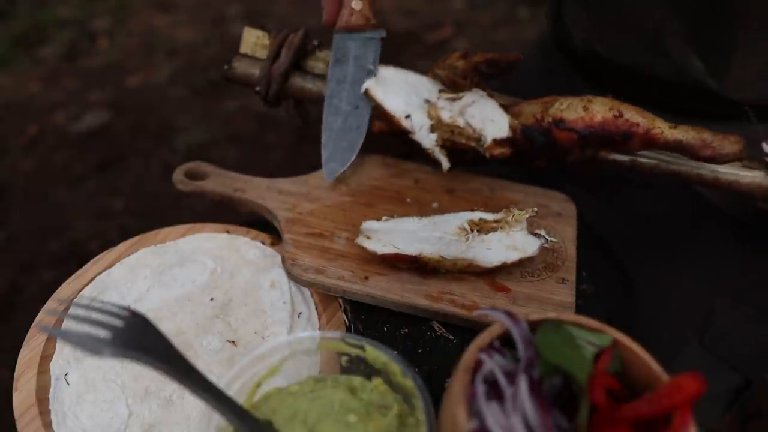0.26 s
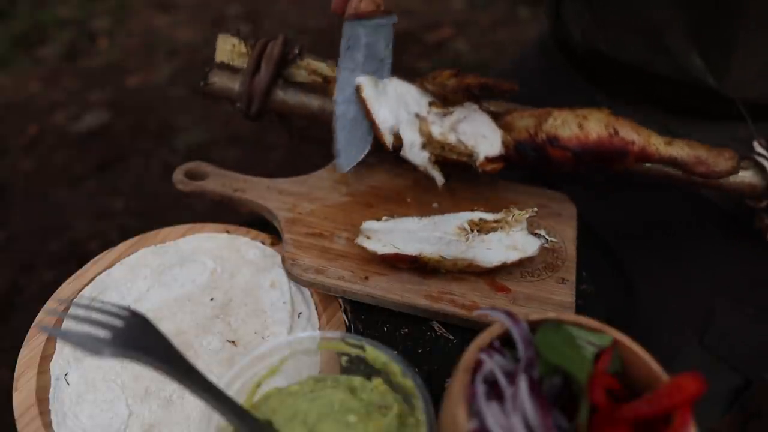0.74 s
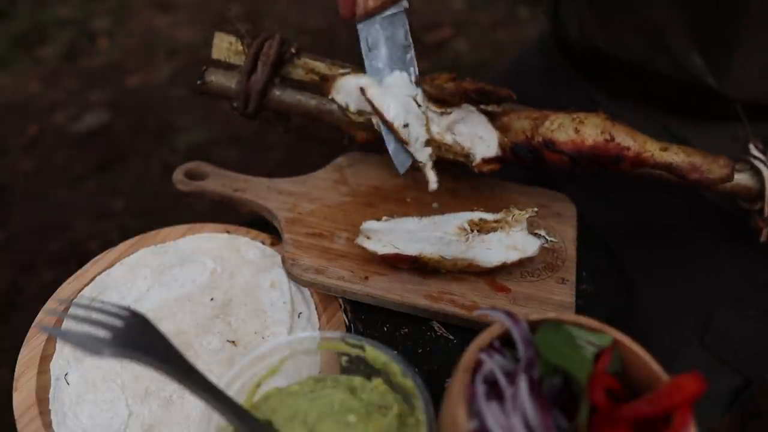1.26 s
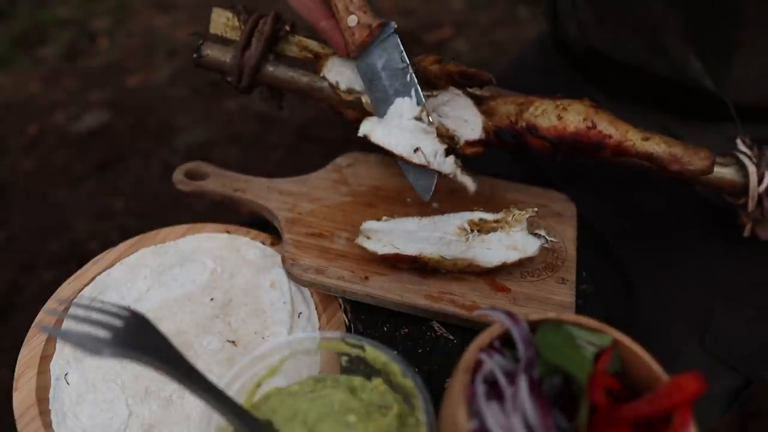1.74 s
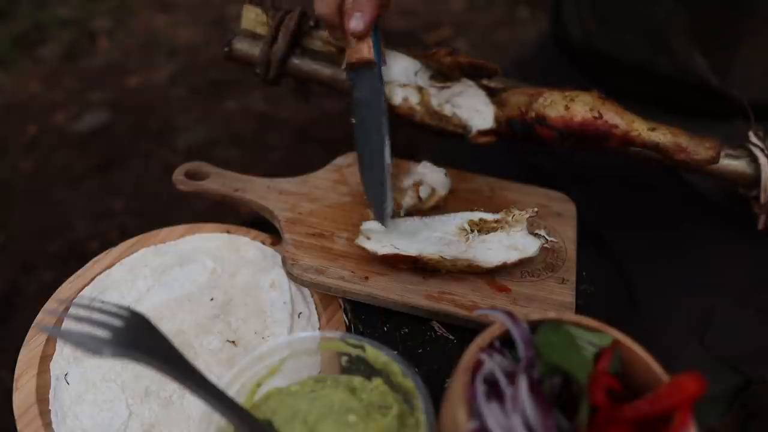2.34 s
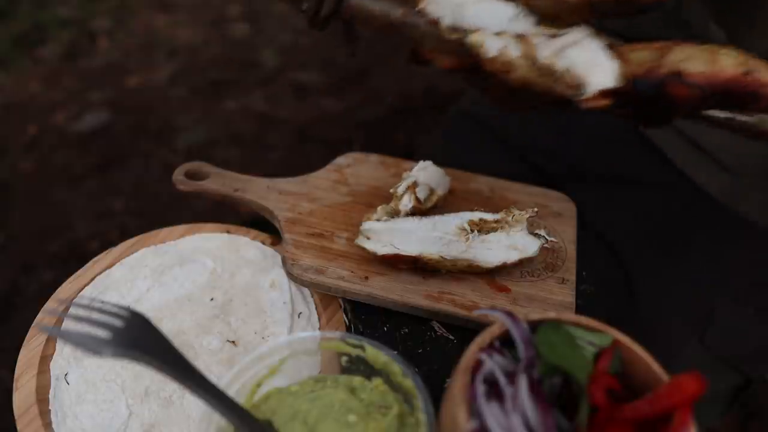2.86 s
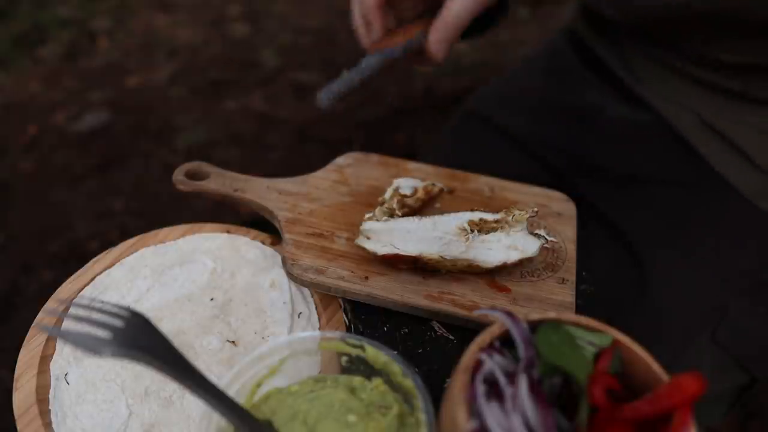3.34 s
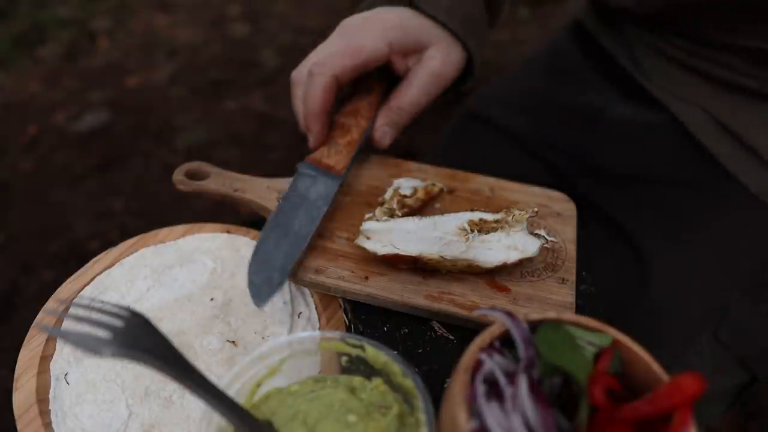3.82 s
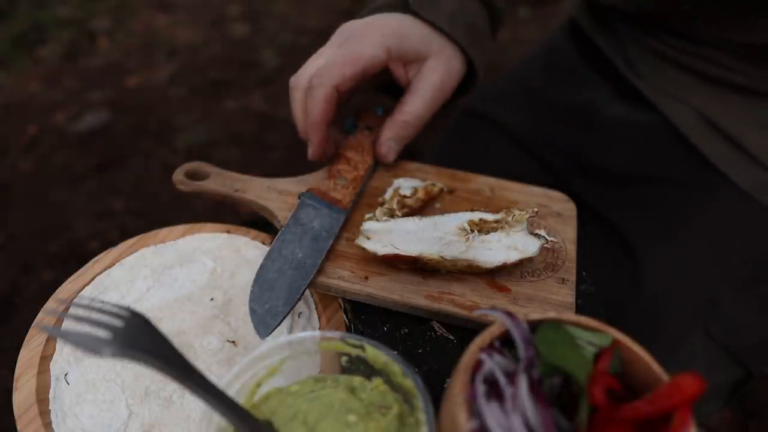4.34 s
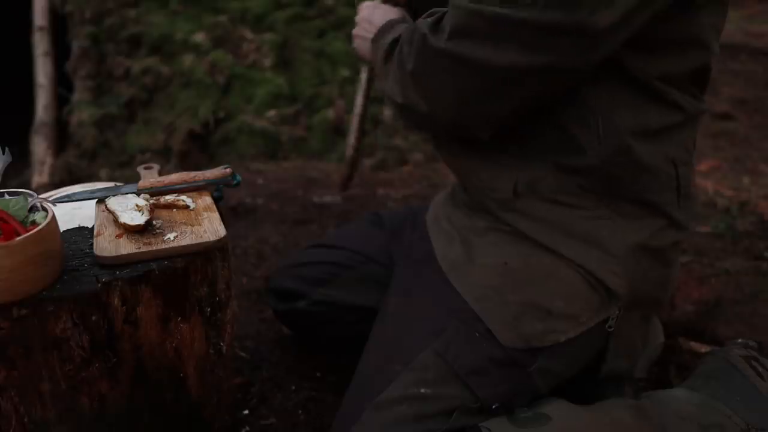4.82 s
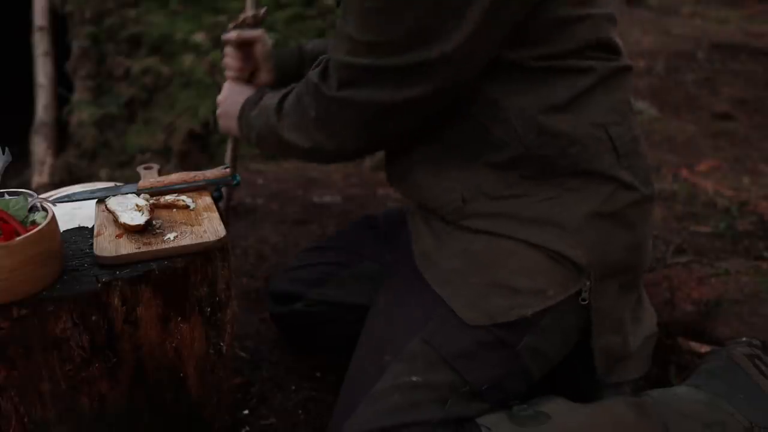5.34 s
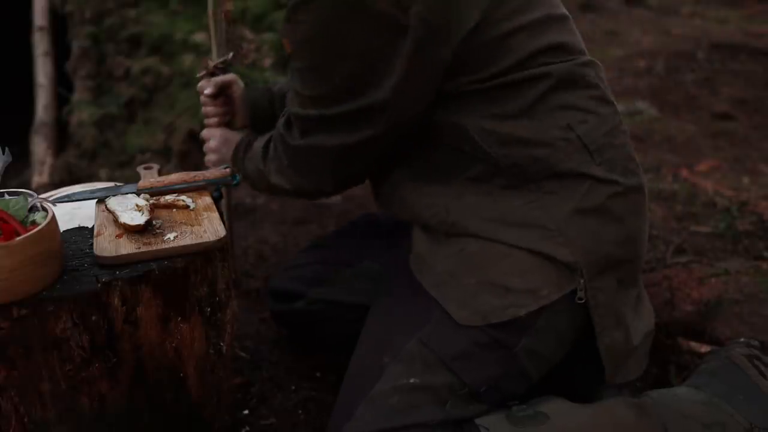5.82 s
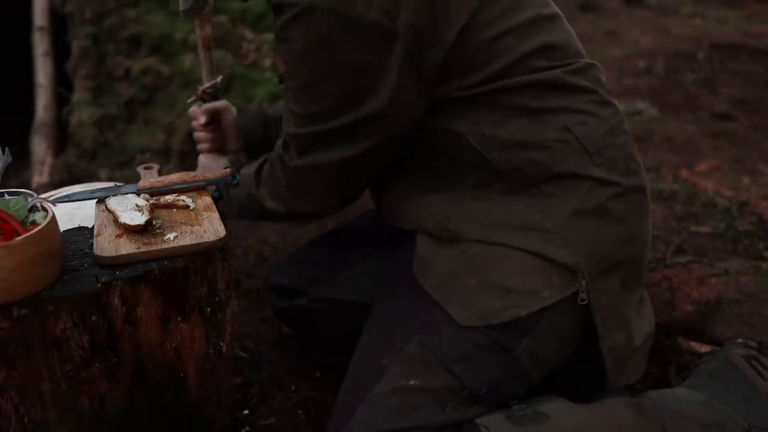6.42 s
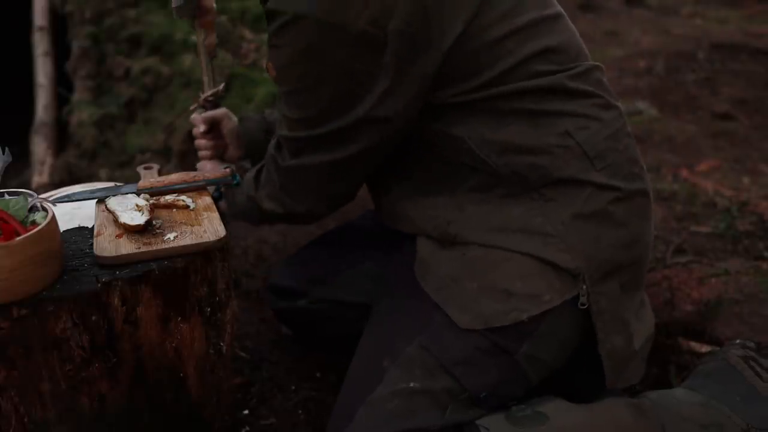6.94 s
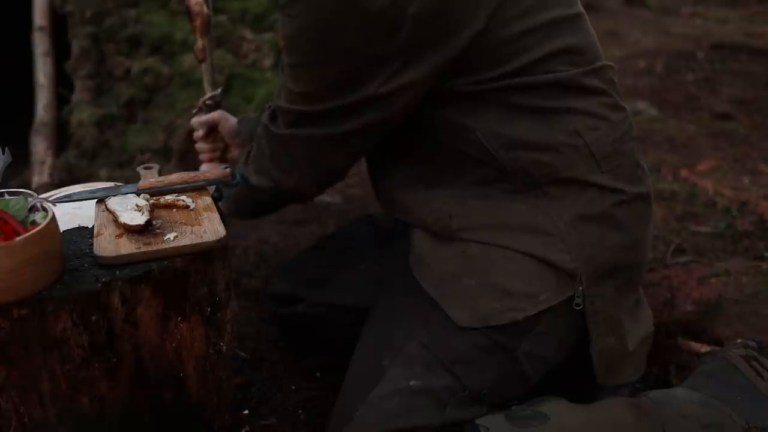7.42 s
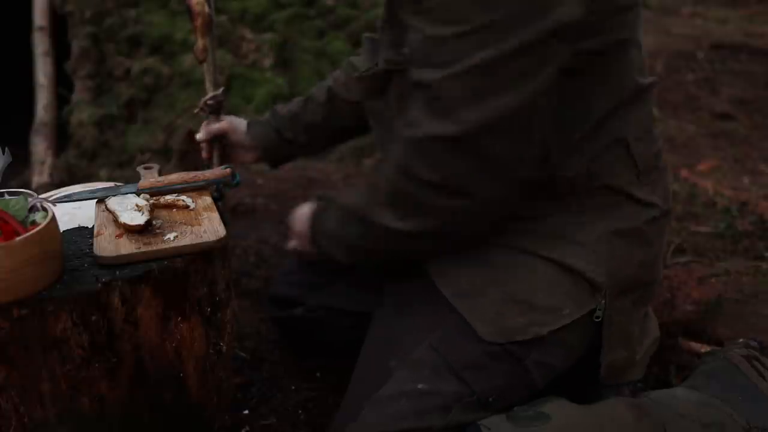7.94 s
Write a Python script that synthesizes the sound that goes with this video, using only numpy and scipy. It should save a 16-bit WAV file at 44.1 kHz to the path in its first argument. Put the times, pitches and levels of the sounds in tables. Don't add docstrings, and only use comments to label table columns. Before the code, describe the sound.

Very close to one microphone outdoors, fat spits and meat fibres tear with dry crackles as a knife saws, over a low throbbing hum of two distant motors. Embers pop and a sleeve rustles. The knife lands on a wooden board with a hard, distorted knock and rocking clacks. The hum then cuts off, leaving louder cloth rustle and twigs snapping under a stick.

```python
import sys
import numpy as np
from scipy import signal
from scipy.fft import rfft, irfft, next_fast_len
from scipy.io import wavfile
from scipy.ndimage import uniform_filter1d

SR = 44100
rng = np.random.default_rng(int(sys.argv[2]) if len(sys.argv) > 2 else 0)


def amplitude_ratio(level_db):
    exponent = np.asarray(level_db, float) / 20
    return 10 ** exponent


def log_audio(samples):
    frames = np.atleast_2d(samples).T
    limited = np.clip(frames, -1, 1)
    pcm = np.round(limited * 32767).astype(np.int16)
    wavfile.write(sys.argv[1], SR, pcm)


N = 360736
FLOOR_EDGE_HZ = 15800

# t/s, level/dB, tilt/dB per octave, steel tick/dB, damping factor
FLAT_HITS = [
    (4.0430, 6, 0, -10, 1.01),
    (4.0475, -6, -1.5, -13, 1.5),
    (4.0590, -18, -2.5, -18, 1.01),
    (4.0664, -22, -2.5, -20, 1.01),
    (4.0798, -14, -2.5, -14, .75),
    (4.0880, -24, -4, -20, .8),
    (4.0940, -21, -6, -25, .7),
]


def evened(x):
    return x / np.sqrt(np.mean(x ** 2) + 1e-20)


def read(points, hz):
    f, value = np.transpose(points)
    return np.interp(np.log(hz + 1), np.log(f + 1), value)


def add(mix, s, sound):
    part = mix[max(round(s * SR), 0):][:len(sound)]
    part += sound[:len(part)]


def band(x, hz, width_hz):
    centre_hz = np.clip(hz, 20, .45 * SR)
    return signal.lfilter(*signal.iirpeak(centre_hz, centre_hz / width_hz, SR), x)


def dulled(x, hz, order=4):
    return signal.sosfilt(signal.butter(order, min(hz, .45 * SR), fs=SR, output="sos"), x)


def noise(spectrum, patchy_db, flicker_db):
    frames, hz = N // 128 + 5, np.fft.rfftfreq(512, 1 / SR)
    real, imaginary, patches = rng.standard_normal((frames, 257, 3)).T
    patches = evened(uniform_filter1d(uniform_filter1d(patches, 10, 0), 20, 1))
    flicker = flicker_db * rng.standard_normal(frames)
    field_db = read(spectrum, hz)[:, None] + patchy_db * patches + flicker
    field = (real + 1j * imaginary) * amplitude_ratio(field_db)
    return evened(signal.istft(field, nperseg=512, noverlap=384)[1][:N])


def air(extra=((1, 0), (2, 0)), db=0):
    # f/Hz, density/dB per Hz
    air_colour = [(12, -37), (22, -16.5), (91, 5), (500, -8), (1310, -18.5), (2870, -28.5), (6130, -23.5),
                  (15000, -36.5)]
    count = next_fast_len(N)
    hz = np.fft.rfftfreq(count, 1 / SR)
    size = amplitude_ratio(read(air_colour, hz))
    coloured = irfft(rfft(rng.standard_normal(count)) * size * amplitude_ratio(read(extra, hz)), count)[:N]
    return amplitude_ratio(-53 + db) * coloured / np.sqrt(np.mean(size ** 2))


def motors():
    shaft_hz = (88.79, 99.80)
    crest_s = (.0012, .0068)
    # multiple of shaft f, level/dB
    shaft_orders = [
        [(1, 0), (2, -15)],
        [(1, -7.5), (2, -21), (3, -17.5)],
    ]
    # t/s, hum level/dB, overtones/dB
    hum_drift = [(0, -49.5, 1.5), (.8, -47, 1), (1.2, -46, -11), (2, -46.5, -8), (2.4, -47, -4.5),
                 (3, -48.5, 4), (4, -47, 5), (4.77, -50.5, 0)]
    # t/s, level/dB
    whine_drift = [(.1, -71), (.25, -58.5), (.8, -58), (1.0, -69)]
    s, hum_db, over_db = np.transpose(hum_drift)
    t, hum = np.arange(N) / SR, np.zeros(N)
    overtones_db = np.interp(t, s, over_db)
    for hz, crest, orders in zip(shaft_hz, crest_s, shaft_orders):
        for k, db in orders:
            hum += amplitude_ratio(db + (k > 1) * overtones_db) * np.cos(2 * np.pi * k * hz * (t - crest))
    hum *= np.sqrt(2) * amplitude_ratio(np.interp(t, s, hum_db)) * np.clip((s[-1] - t) * 200, 0, 1)
    whine = evened(band(rng.standard_normal(N), 1020, 130))
    whine *= amplitude_ratio(np.interp(t, *np.transpose(whine_drift)))
    return hum + whine * (t < 1)


def jacket():
    # f/Hz, density/dB per Hz
    body_colour = [(120, -15.5), (250, -13), (450, -5.5), (1100, -4.5), (2200, -8), (3500, -15),
                   (6000, -35)]
    hiss_colour = [(1800, -8), (2800, 0.5), (5500, 1.5), (7000, -1), (8300, 2.5), (9800, -9), (11000, -40)]
    fizz_colour = [(8500, -22), (10500, -9), (13000, -5.5), (15600, -14), (16100, -29)]
    # start t/s, length/s, rub level/dB, brightness/dB
    moves = [(0, 0.028, -67, 9), (0.233, 0.08, -58.5, -5), (0.492, 0.21, -59, -0.5), (0.823, 0.12, -56, 5),
             (1.065, 0.12, -73, 16), (1.274, 0.065, -56.5, 7.5), (1.463, 0.3, -55.5, 0),
             (1.996, 0.3, -53.5, 2), (2.557, 0.25, -60.5, 1.5), (2.87, 0.11, -58.5, 0),
             (3.083, 0.22, -54.5, -3), (3.303, 0.3, -52, -10), (3.687, 0.13, -55.5, -18),
             (4.095, 0.26, -77, -14), (4.686, 0.08, -53, -11), (4.75, 0.046, -47, -5),
             (4.75, 0.63, -44, -7.5), (5.394, 0.25, -54.5, -11), (5.755, 0.34, -51, -6),
             (6.15, 0.026, -46.5, -9), (6.298, 0.36, -53, -7), (6.802, 0.17, -53.5, -6),
             (7.137, 0.073, -47, -5), (7.417, 0.34, -51.5, -7.5), (7.797, 0.2, -47, -7),
             (7.919, 0.082, -41, -5.5), (8.052, .15, -38.5, -0.5)]
    fibres_hz = (2500, 3500, 5470, 6300, 8100, 9000)
    rise_s, fall_s, long_fall = 0.076, 0.069, 0.31
    rest_body_db, rest_hiss_db = -59, -60
    cut_s = 4.776
    fibres_per_s = 250

    t = np.arange(0, N + 64, 64) / SR
    start, length, rub_db, bright_db = np.transpose(moves)[:, :, None]
    rise = np.clip((t - start) / rise_s + .5, 0, 1)
    fall = np.clip((start + length - t) / (fall_s + long_fall * length) + 1, 0, 1)
    shape = rise * fall * ((t >= cut_s) | (start < cut_s - .05))

    def followed(rest_db, move_db):
        return np.sqrt(amplitude_ratio(2 * rest_db) + ((amplitude_ratio(move_db) * shape) ** 2).sum(0))

    body = followed(rest_body_db, rub_db)
    hiss = followed(rest_hiss_db, rub_db + bright_db)
    fizz = amplitude_ratio(-61) * (hiss / amplitude_ratio(-53.5)) ** 0.71
    body, hiss, fizz = (np.interp(np.arange(N) / SR, t, level) for level in (body, hiss, fizz))
    rub = body * noise(body_colour, patchy_db=.9, flicker_db=1.5)
    rub += hiss * noise(hiss_colour, patchy_db=2, flicker_db=1.8)
    catches = amplitude_ratio(8.1 * np.minimum(rng.exponential(1, N), 4)) * (rng.random(N) < fibres_per_s / SR)
    pick = rng.integers(0, len(fibres_hz), N)
    fibres = np.zeros(N)
    for k, hz in enumerate(fibres_hz):
        fibres += band(band(catches * (pick == k), hz, 0.2 * hz), hz, 0.56 * hz)
    rub += amplitude_ratio(-6.5) * hiss * evened(fibres)
    return rub + fizz * noise(fizz_colour, patchy_db=.9, flicker_db=1.5)


def drizzle():
    rate = 100 + 150 * np.exp(-np.arange(N) / SR / 0.19)
    size = amplitude_ratio(3.2 * np.minimum(rng.exponential(1, N), 3.3)) * (rng.random(N) < rate / SR)
    pick = rng.integers(0, 4, N)
    centres_hz = (3500, 6000, 8500, 11900)
    return amplitude_ratio(-42.0) * sum(band(size * (pick == k), hz, 0.58 * hz) for k, hz in enumerate(centres_hz))


def crackle(db, hz, low_db, top_db, chance):
    t = np.arange(len(chance)) / SR
    ruptures = 0.1 * chance * abs(chance) * amplitude_ratio(-60 * t / (0.011 + .022 * amplitude_ratio(db)))
    ruptures[0] = 1
    wide_hz = (0.39 + 0.043 * max(db + 44.5, 0)) * hz
    wide_hz = np.clip(wide_hz, 500, SR / 6)
    ring = band(band(ruptures, hz, wide_hz), hz, 2 * wide_hz)
    dull = band(ruptures, hz=1280, width_hz=2000)
    top = band(ruptures, hz=12500, width_hz=2200)
    gains_db = (1.6, low_db + 12.0, top_db - 1.0)
    return sum(amplitude_ratio(db + g) * part / abs(part).max() for g, part in zip(gains_db, (ring, dull, top)))


def crackles():
    # t/s, level/dB, f/Hz
    spits = [(.007, -32.5, 8000), (0.021, -35, 10500), (.034, -40, 9400), (.038, -32, 6140),
             (.0478, -39, 11500), (0.056, -39, 10500), (.0645, -37, 6000), (.071, -42, 11500),
             (.0832, -34, 7190), (.1032, -36, 11000), (0.1407, -42, 6000), (.1555, -41, 12000),
             (.1665, -38, 9000), (.177, -35, 7500), (0.192, -38, 13500), (.2324, -39, 9500),
             (.4005, -34, 8890), (0.4532, -35, 7860), (.5127, -37, 7500), (0.5622, -30, 8000),
             (.573, -36, 10000), (.607, -37, 12500), (.7517, -38, 6150), (.8522, -36, 5800),
             (1.209, -39, 4650), (1.2763, -34, 8300), (1.5312, -34, 4320), (1.6519, -41, 6010),
             (1.9517, -43, 6560), (2.1052, -39, 4000), (2.186, -43, 3000), (2.3064, -33, 6080),
             (2.5366, -41, 3620), (2.6875, -36, 6500), (3.0616, -32, 6550), (3.2208, -35, 6040),
             (3.2857, -48, 3000), (3.9167, -42, 8500), (4.008, -34, 12000), (4.143, -43, 12000),
             (4.2844, -47, 9000), (4.3118, -46, 12500), (4.4295, -49, 11000), (4.5702, -46, 5500),
             (4.6251, -41, 6500), (4.9568, -36, 8000), (5.0383, -38, 3500), (5.0945, -38, 3500),
             (5.516, -40, 3500), (6.164, -33, 3500), (6.221, -35, 3500), (6.2965, -24, 6000),
             (6.5557, -32, 6330), (6.87, -40, 5500), (6.8899, -36, 4500), (7.099, -35.5, 3500),
             (7.1816, -37, 3260), (7.2143, -37, 3290), (7.9067, -34, 3500), (8.059, -36, 3500)]
    # t/s, level/dB, f/Hz
    tears = [(0.1156, -19, 5700), (0.2564, -32, 6200), (.2813, -30.5, 6170), (.3874, -37, 8460),
             (0.4254, -32, 8560), (0.476, -19.5, 12500), (0.491, -20, 8500), (.537, -27.5, 6150),
             (.585, -20, 11900), (.618, -17, 6260), (0.652, -34, 6740), (.6697, -35, 8100),
             (.8043, -22.5, 6000), (.828, -28.5, 6040), (0.913, -30, 6000), (.9878, -31, 8260),
             (1.022, -32, 8610), (1.155, -32, 6000), (1.185, -32.5, 5500), (1.2934, -34, 3790),
             (1.3206, -30.5, 8180), (1.526, -33.5, 7600), (1.685, -32.5, 6470), (1.7646, -32.5, 5630),
             (1.891, -31.5, 5400), (1.9799, -31, 4900), (2.2993, -28, 9520), (2.423, -36, 8140)]
    # t/s, level/dB, f/Hz, thin top/dB
    embers = [(2.46, -41, 3500, -30), (2.6063, -7.5, 6440, -30), (2.69, -26, 6960, -24),
              (2.7799, -26.5, 3520, -30), (2.894, -28.5, 5600, -22), (2.943, -34, 5740, -12),
              (2.9624, -33, 13900, -14), (2.994, -23, 6800, -20), (3.0536, -37, 5900, -22),
              (3.1068, -26.5, 6070, -12), (3.123, -20.5, 8100, -20), (3.264, -30, 6110, -20),
              (3.3452, -24.5, 6200, -22), (3.3842, -30.5, 6480, -24), (3.4555, -32.5, 7350, -18),
              (3.5755, -22, 5640, -17), (3.6174, -23, 5840, -18), (3.7618, -26.5, 5440, -5),
              (3.769, -24.5, 5430, -7), (3.8418, -30, 4070, -29), (4.539, -30.5, 6270, -28),
              (4.6754, -25.5, 7640, -20), (4.6927, -33, 6300, -22), (5.4347, -28, 3100, -18),
              (5.6018, -32.5, 7500, -22), (5.7084, -32.5, 6560, -15), (5.739, -31.5, 6380, -17),
              (5.8324, -34, 3320, -12), (6.697, -26.5, 7180, -18), (7.2994, -28, 6850, -4)]
    # t/s, level/dB, f/Hz, dull part/dB
    snaps = [(3.3009, -19, 5900, -15), (4.7766, -41.5, 3420, 6.5), (4.9028, -13.5, 5500, -5.5),
             (5.7844, -37.5, 3510, -5.5), (5.87, -45.5, 2480, 9), (5.913, -49, 3260, 13),
             (5.9901, -42, 3170, 7.5), (6.0727, -30.5, 3470, -12), (6.1218, -35, 3530, -3),
             (6.1517, -19, 3000, -7.5), (6.167, -27.5, 2980, -0.5), (6.187, -39.5, 2720, 7.5),
             (6.197, -31, 6220, -3), (6.2264, -32, 4780, 0), (6.2742, -38, 2870, -13),
             (6.293, -8, 6600, -24.5), (6.3491, -41, 2540, 3.5), (6.3921, -25, 8400, -10.5),
             (6.4511, -25.5, 3400, -24), (6.5072, -32, 3170, -23), (6.543, -33.5, 2510, -20),
             (6.571, -21.5, 7300, -5.5), (6.6745, -26, 2900, -4), (6.831, -45, 3190, 7),
             (6.841, -34.5, 3340, 2.5), (6.8534, -26.5, 3030, -17), (7.255, -41.5, 2920, 4.5),
             (7.5893, -36, 2880, -5), (7.7965, -34.5, 4480, -3.5), (7.8488, -33.5, 5500, 2)]
    thin_db = -17
    pops = [row + (thin_db - .3 * (row[1] + 30),) for row in tears]
    pops += embers
    pops += [row + (thin_db,) for row in spits]

    out, chance = np.zeros((2, N)), rng.standard_normal((200, 1500))
    sounds = []
    for (s, db, hz, top_db), c in zip(pops, chance):
        low_db = -49.5 + 0.26 * (db + 21) - db
        sounds.append(crackle(db, hz, low_db, top_db, c))
    for (s, db, hz, low_db), c in zip(snaps, chance[len(pops):]):
        top_db = -24.5 + 1.4 * (db + 25)
        sounds.append(stick(crackle(db, hz, low_db, top_db, c)))

    edge = signal.firwin(127, FLOOR_EDGE_HZ, fs=SR)
    for row, sound, c in zip(pops + snaps, sounds, chance):
        s, db = row[:2]
        if db <= -24:
            sound = np.convolve(sound, edge, "same")
        add(out[0], s + 0.00045, sound)
        add(out[1], s + 0.00045, amplitude_ratio(-23) * c[-1] * band(sound, hz=10200, width_hz=1700))
    return out


def rung(modes, damping, rise_s=.00015):
    t = np.arange(4000) / SR
    ring = sum(amplitude_ratio(db - 60 * t * damping / t60) * np.sin(2 * np.pi * hz * t) for hz, db, t60 in modes)
    return ring * (1 - np.exp(-t / rise_s))


def knife():
    # f/Hz, level/dB, t60/s
    blade_modes = [
        [(1230, 17.5, 0.041), (1420, -1.5, 0.031), (1710, 7.5, 0.03), (830, -52, 0.0062)],
        [(3080, -7.5, 0.032), (3350, 2.5, 0.012), (4620, -10, 0.031), (6000, 0, 0.008), (7750, -6, 0.011)],
    ]
    # start t/s, length/s, first level/dB, last level/dB, high modes/dB
    scrapes = [
        (0.904, 0.041, -43, -44, 2),
        (0.971, 0.0485, -46, -36.5, 1),
        (4.091, 0.078, -60, -55, 12.5),
        (4.176, 0.07, -49.5, -47, 6),
        (4.317, 0.041, -51, -42.5, 3),
    ]
    # t/s, low modes/dB, high modes/dB
    slip_hits = [(.906, -26, -36), (0.9138, -33, -19.5), (.922, -18.5, -27), (.9265, -26, -32),
                 (.933, -16, -33), (.938, -29, -30), (0.985, -33, -28), (0.9974, -21, -21),
                 (1.004, -23, -33), (1.009, -21.5, -36)]
    # f/Hz, level/dB, t60/s
    flat_modes = [(253, -26, .02), (565, -17, .03), (1030, -2, .016), (1250, 1.5, .018), (1696, -16, .025),
                  (2300, 1.5, .009), (2552, -18, .035), (3042, -8, .015), (3380, 3, .01), (4565, -4, .011),
                  (5700, -18, .011), (7620, -24, .014), (8500, -16, .006), (10230, -38, .026)]
    tip_modes = [(856, -6, 0.052), (1204, 5, 0.039), (1701, -12, .046), (1940, -4, 0.029),
                 (2347, -18, 0.028), (2900, -4, 0.014), (3305, 1.5, 0.023), (4393, -19, .016),
                 (5900, -17, 0.013), (7700, -28, .03)]
    heel_modes = [(584, -16, 0.071), (780, -14, 0.041), (915, -17.5, .07), (1040, 0, .02),
                  (1257, 2.5, 0.049), (1523, -20, .06), (1690, -19, .047), (2060, -21, .05),
                  (2610, -23.5, .04), (3420, -22, .025), (4180, -34, .035), (5170, -33.5, .02),
                  (6600, -24.5, .007)]
    handle_modes = [(584, -4.5, 0.066), (754, -5, .04), (829, -1.5, .028), (1040, 3, 0.021),
                    (1260, 4.5, 0.044), (1530, -23, .025), (1710, -21, .035), (2051, -19.5, .03),
                    (2640, -20, .035), (3009, -25, 0.039), (3480, -17.5, 0.02), (4091, -32.5, .04)]
    # t/s, level/dB, tilt/dB per octave, steel tick/dB, damping factor
    tip_hits = [
        (4.1743, -15, 0, 10.7, 1.16),
        (4.1995, -13.5, 0, 7.6, 1.1),
    ]
    heel_hits = [
        (4.3605, -0.33, 0, -19, 1.01),
    ]
    handle_hits = [
        (4.2068, -3, 1, -20, 1.2),
        (4.219, -23, -3, -30, 1.9),
        (4.2240, -32, -3, -25, 1.8),
        (4.4161, -7.5, 4, -18.5, 1.5),
        (4.4715, -39, -8, -30, 1.1),
    ]
    landings = ((flat_modes, FLAT_HITS), (tip_modes, tip_hits),
                (heel_modes, heel_hits), (handle_modes, handle_hits))

    out, draws = np.zeros(N), iter(rng.standard_normal((20, 600)))
    rattle = 0.048 * amplitude_ratio(-60 * np.arange(600) / SR / 0.019)
    for modes, hits in landings:
        for s, db, tilt_db, tick_db, damping in hits:
            chatter = rattle * next(draws)
            chatter[0] = 1
            tilted = [(hz, g + tilt_db * max(np.log2(hz / 1250), 0), t60) for hz, g, t60 in modes]
            ring = signal.fftconvolve(chatter, rung(tilted, damping, rise_s=.0003))
            ring = ring - dulled(ring, 400, order=1)
            tick = dulled(band(chatter, hz=3140, width_hz=1700), 3580, order=5)
            tick += 0.11 * amplitude_ratio(0.86 * db) * band(chatter, hz=6800, width_hz=2900)
            add(out, s, amplitude_ratio(db) * ring / abs(ring).max())
            add(out, s, amplitude_ratio(db + tick_db) * tick / abs(tick).max())

    blade_rings = [rung(modes, 1.0) for modes in blade_modes]
    blade_low, blade_high = (ring / np.linalg.norm(ring) for ring in blade_rings)
    for s, length, first_db, last_db, high_db in scrapes:
        t = np.arange(0, 1, 1 / SR / length)
        catches = rng.random(len(t)) < 350 / SR
        slips = evened(rng.standard_normal(len(t)) * (0.27 + catches * 1.7))
        slips = slips * amplitude_ratio(first_db + (last_db - first_db) * t) * signal.windows.tukey(len(t), .3)
        add(out, s, signal.fftconvolve(slips, blade_low))
        add(out, s, signal.fftconvolve(slips * amplitude_ratio(high_db - 14 * t), blade_high))
    for s, low_db, high_db in slip_hits:
        add(out, s, amplitude_ratio(low_db + 8) * blade_low + amplitude_ratio(high_db + 6.5) * blade_high)
    return out


def bumps():
    # t/s, level/dB, f/Hz, t60/s
    thuds = [(.925, -34.5, 234, 0.056), (2.6080, -9.5, 3820, 0.0051), (2.613, -34, 3050, 0.026),
             (2.779, -41.5, 2530, 0.035), (2.779, -37, 3550, .015), (2.958, -33.5, 447, 0.016),
             (3.46, -22, 393, 0.016), (3.5072, -26, 570, 0.014), (4.043, -15, 69.2, 0.043),
             (4.21, -23, 272, 0.098), (4.385, -42, 45.2, 0.48), (4.40, -28, 87, 0.19),
             (4.468, -21, 90.5, 0.041), (4.2657, -40, 5900, .004), (4.4025, -45, 5300, .004),
             (4.4165, -11.5, 810, 0.028), (6.4864, -35, 2900, .008), (4.3622, -26, 444, 0.12),
             (4.418, -22, 292, 0.031), (4.48, -35, 400, 0.044), (4.797, -27, 795, 0.012),
             (4.9315, -21.5, 617, 0.023), (6.072, -29.5, 640, 0.019), (6.166, -21.5, 490, 0.016),
             (6.852, -37, 280, 0.039), (7.959, -57.5, 900, 0.023), (8.087, -11, 650, 0.01)]
    out, t = np.zeros(N), np.arange(14000) / SR
    for s, db, hz, t60 in thuds:
        ring = np.sin(2 * np.pi * hz * t) + 0.43 * np.sin(2 * np.pi * 1.8 * hz * t)
        add(out, s, amplitude_ratio(db - 60 * t / t60) * ring * np.clip(t * hz * 2.1, 0, 1))
    return out


def stick(snap):
    hollow = 0.4 * band(snap, hz=5300, width_hz=6500)
    ring = 0.56 * band(snap, hz=7650, width_hz=1550)
    return dulled(snap - hollow + ring, 8400, order=2)


def reflections(close):
    taps = dulled(rng.standard_normal(2600), 4300, order=1) * amplitude_ratio(-60 * np.arange(2600) / SR / 0.023)
    return amplitude_ratio(-16) * signal.fftconvolve(close, taps / np.linalg.norm(taps))[:N]


def scene():
    # f/Hz, level/dB
    apart = [(60, -47), (150, -59), (380, -38.5), (950, -36), (2380, -26.5), (5980, -26), (15000, -13.5)]
    pops, side = crackles()
    close = pops + knife() + bumps()
    close += reflections(close)
    opposite = np.array([[1], [-1]])
    floor = air() + jacket() + drizzle() + opposite * air(apart, db=12.0)
    edge = signal.firwin(511, FLOOR_EDGE_HZ, window=("kaiser", 8), fs=SR)
    floor = signal.oaconvolve(floor, edge[None], "same")
    since = np.arange(N) / SR - FLAT_HITS[0][0]
    floor *= amplitude_ratio(-20 * (since > 0) * np.clip((0.036 - since) / .01 + 1, 0, 1))
    return close + motors() + floor + opposite * side


def band_limit(x):
    return signal.sosfilt(signal.butter(12, 16800, fs=SR, output="sos"), x)


def record(dry):
    limit_db, duck, recover_db_per_s = -1.5, 0.37, 249.5
    fall = np.arange(N) * recover_db_per_s / SR
    level_db = 20 * np.log10(abs(dry[0]) + 1e-9)
    held_db = np.maximum.accumulate(level_db + fall) - fall
    over_db = np.maximum(held_db - limit_db, 0)
    over_db = signal.lfilter(np.ones(220) / 220, 1, over_db)
    clipped = np.clip(dry / amplitude_ratio(duck * over_db), -1, 1)
    edge = signal.firwin(255, 16500, window=("kaiser", 8), fs=SR)
    limited = signal.oaconvolve(clipped, edge[None], "same")
    return band_limit(limited + .0005)


dry = scene()
out = record(dry)
log_audio(out)
```